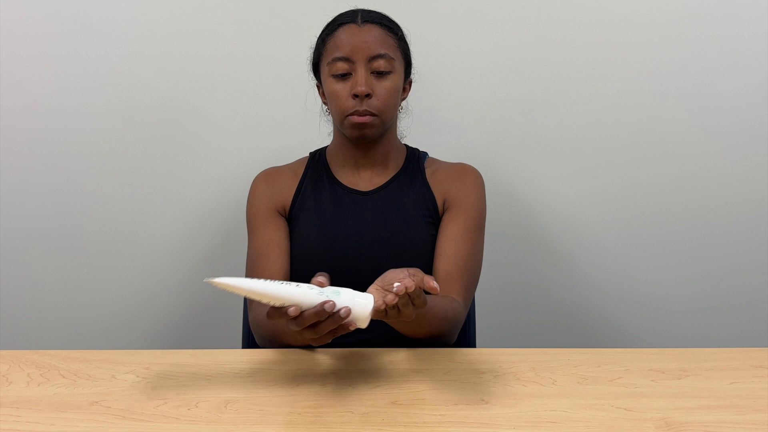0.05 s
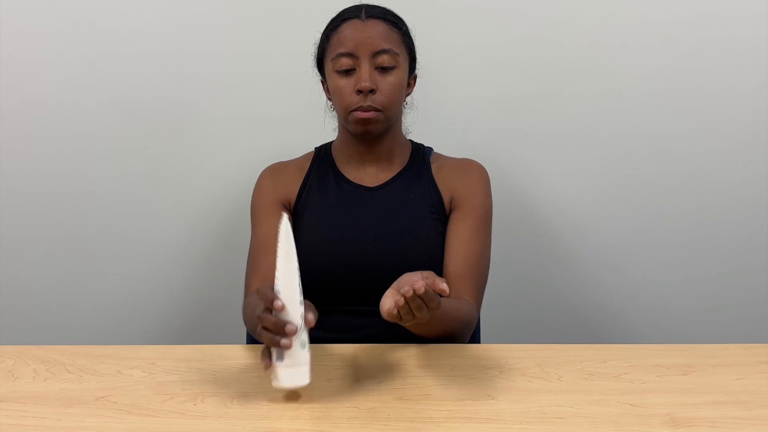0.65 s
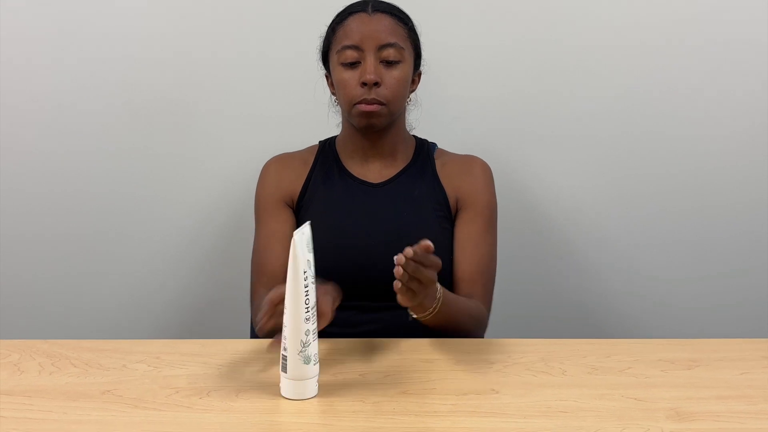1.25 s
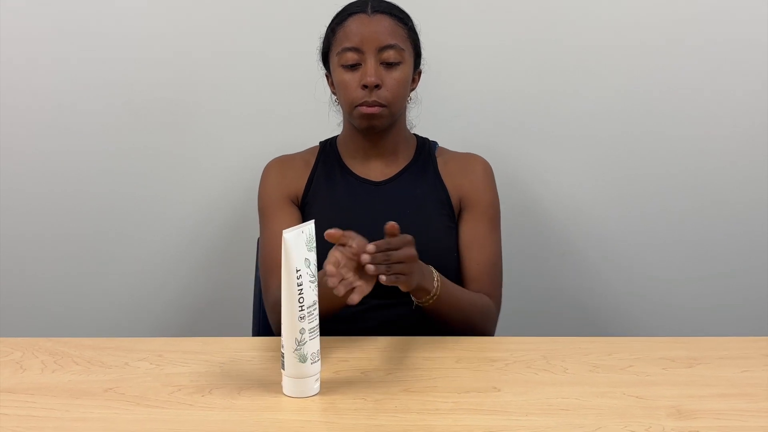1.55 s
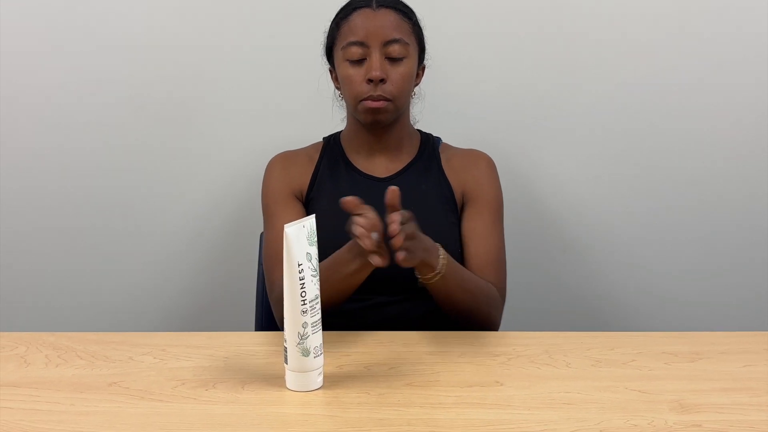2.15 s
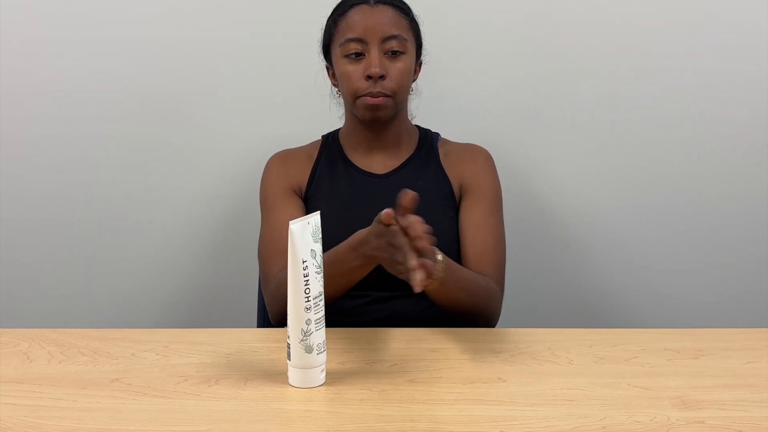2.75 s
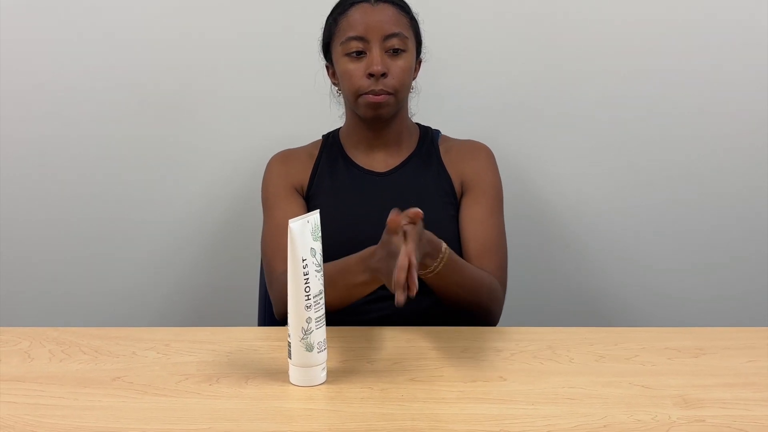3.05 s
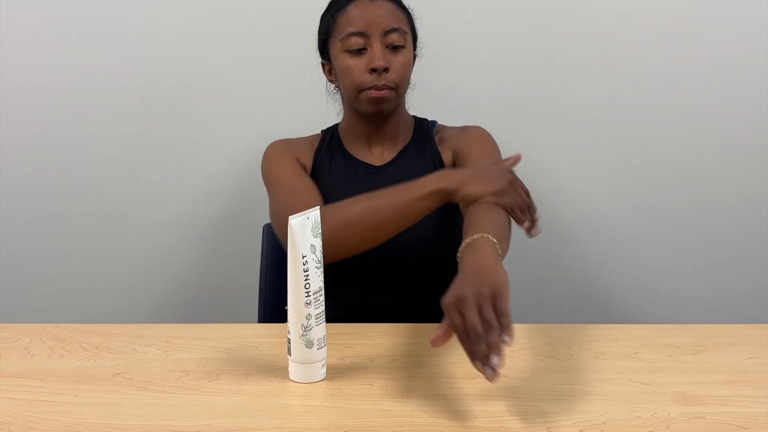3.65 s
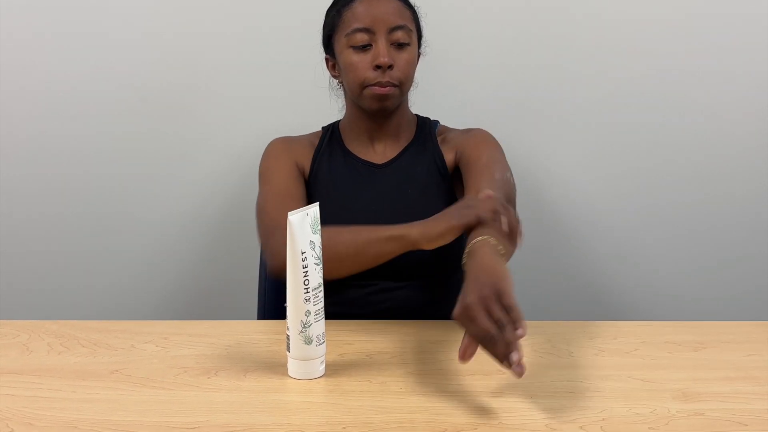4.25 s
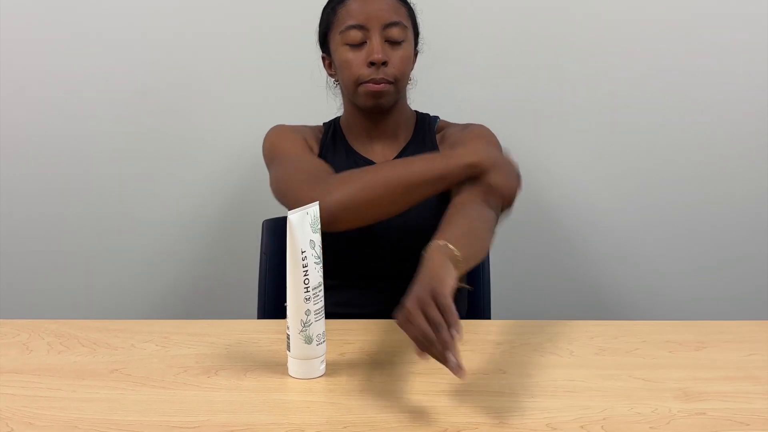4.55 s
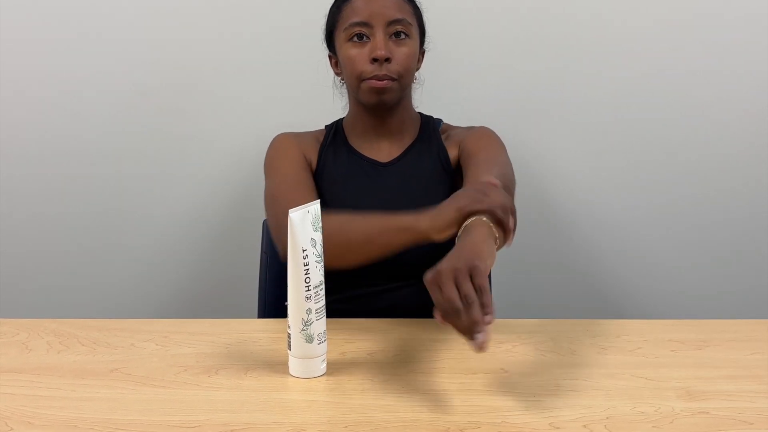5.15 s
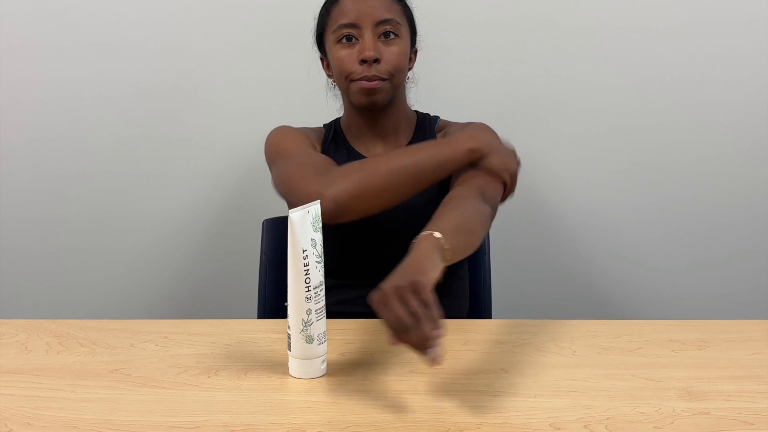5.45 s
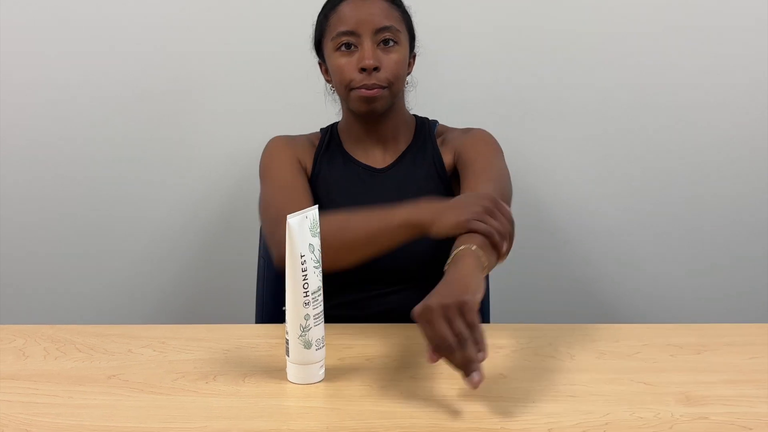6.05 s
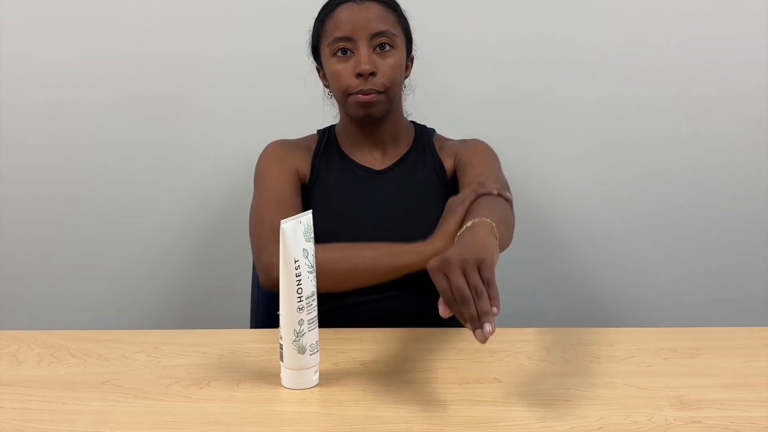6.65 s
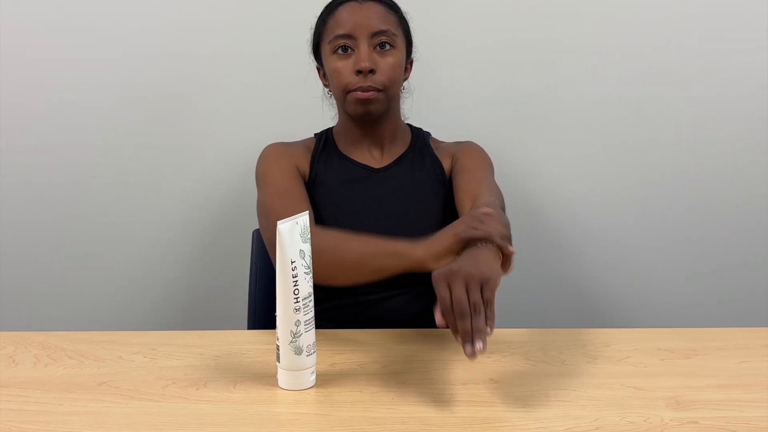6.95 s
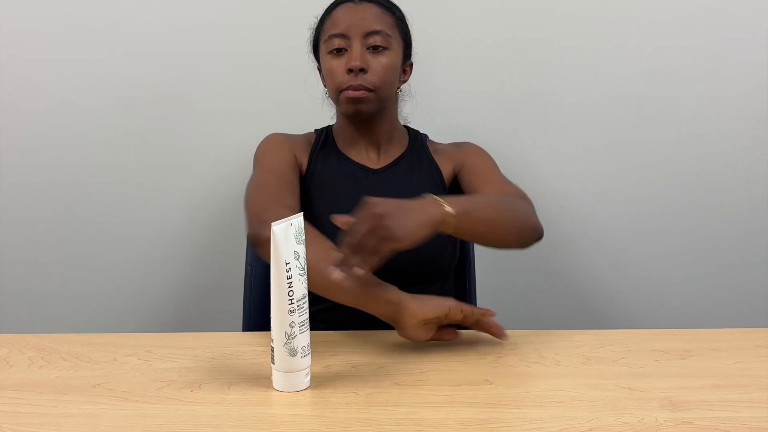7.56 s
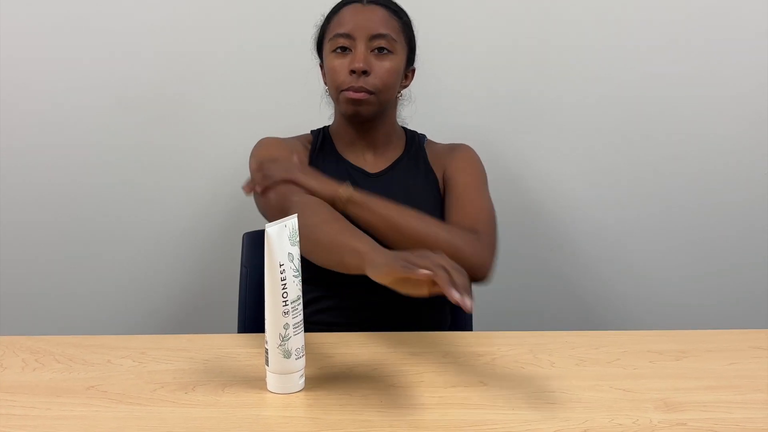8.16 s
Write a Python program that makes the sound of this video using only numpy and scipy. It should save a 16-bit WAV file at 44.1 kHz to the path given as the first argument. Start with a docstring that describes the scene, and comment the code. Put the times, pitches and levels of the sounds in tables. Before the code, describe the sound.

In a small bare room with ventilation rumbling low, nearby stereo microphones catch the sharp click of a lotion cap, slightly left. The tube knocks down on a wooden table and settles with lighter taps. Quiet swishes of palm against palm follow, giving way to longer strokes along an arm, with a few tiny smacks of lotion. Near the end an elbow thumps dully on the table before two more strokes.

```python
"""A small bare room, a stereo microphone pair near a wooden table. A plastic lotion tube snaps shut,
is stood on the table, which rings under it, and rocks to rest. From 2.1 s palms rub together; from
3.6 s a hand strokes up and down an arm. Slipping skin hisses, the hollow under the hand resonates,
lotion smacks. At 7.5 s an elbow bumps the table as the arms change over, and the stroking goes on.
Ventilation rumbles underneath throughout."""
import sys
import numpy as np
from scipy import signal
from scipy.fft import rfft, irfft, next_fast_len
from scipy.io import wavfile

SR = 44100
rng = np.random.default_rng(int(sys.argv[2]) if len(sys.argv) > 2 else 0)


def wrap_up_sound(samples):
    """Save the sound to the file named by the first command line argument, as 16-bit audio."""
    columns = np.atleast_2d(samples).T
    # keep every value between -1 and 1, then stretch to whole-number steps
    tamed = np.clip(columns, -1, 1)
    steps = np.round(tamed * 32767).astype(np.int16)
    wavfile.write(sys.argv[1], SR, steps)


N = 365588
T = np.arange(N) / SR
FFT_SIZE = next_fast_len(N, real=True)

# Palm over palm, then hand along arm; event levels in all tables are relative:
# start t/s, speeding up t/s, slowing down t/s, hiss level/dB, contact/dB, sheen/dB, midway sag/dB
PALM_STROKES = [(2.16, 0.18, 0.04, -66.5, -4.5, -2.5, 5), (2.44, 0.09, 0.092, -63, -2.5, -3.5, -1),
                (2.65, 0.096, 0.13, -62.5, -1, -6, 0.5), (2.86, .1, .11, -60.5, -1.5, -6.5, 3),
                (3.08, 0.11, 0.11, -60.5, -1, -7, 3)]
ARM_STROKES = [(3.6, 0.22, 0.092, -65.5, -2.5, -7.5, -2.5), (3.94, .15, 0.27, -59, -3.5, -8, -1),
               (4.335, .18, .19, -58, -3.5, -8.5, -0.5), (4.72, 0.24, 0.29, -57.5, -5, -7.5, 2.5),
               (5.2, 0.13, 0.23, -58.5, -1.5, -8, 0), (5.585, 0.19, 0.43, -60.5, -3.5, -7, 1),
               (6.05, 0.15, 0.22, -63, -1, -9.5, 0), (6.47, 0.27, .19, -58, -1.5, -7, 10),
               (6.98, 0.11, 0.15, -62, -2, -9, 1), (7.215, .075, 0.11, -69, -4.5, -5.5, -2),
               (7.72, 0.22, 0.12, -67.5, 0, -6.5, -4.5), (8.095, 0.2, .1, -60, -4.5, -8, -1)]
# Hiss of rubbing skin, with the band near 10.5 kHz left out: f/Hz, level/dB
NOTCHED_HISS_COLOUR = [(150, -14), (400, 0), (750, -3.5), (1050, -8), (1400, 1), (2500, -10.5), (4300, 7),
                       (5400, 7), (7200, 9), (8500, 0.5), (10500, -90), (14000, -11)]
# Flat palm on arm, two palms enclosing more air, fine sheen, fingertips: f/Hz, level/dB
FLAT_PALM_COLOUR = [(600, -24), (1300, -9.5), (2100, 0), (3000, -1), (4000, -2.5), (7000, -27)]
CUPPED_COLOUR = [(150, -10), (320, 7), (500, -5), (750, -3), (1100, -4), (2100, 1), (3000, 2), (4000, -3.5),
                 (7000, -29)]
SHEEN_COLOUR = [(6000, -6), (9300, -4.5), (10200, 9), (12000, 9.5), (14000, -13)]
BRUSH_COLOUR = [(1000, -21), (4300, -11), (5500, -2), (6200, -4), (7400, 0.5), (9000, -19), (10600, -1.5),
                (12200, -10), (13500, -30)]
# Room tail of the hiss, a row each for skin, palm contact and sheen: share of energy, t60/s
HISS_TAILS = [(0.2, 0.28), (0.75, 0.28), (.12, 0.26)]
# Air pockets under the hand: middle t/s, length t/s, start f/Hz, end f/Hz, width f/Hz, level/dB
HOLLOWS = [(2.274, 0.078, 1406, 1307, 179, -71), (2.53, 0.12, 1334, 1303, 220, -65.5),
           (2.786, 0.098, 1600, 2190, 450, -65), (2.93, 0.27, 334.8, 310, 161, -64.5),
           (4.454, 0.13, 2032, 2373, 700, -69.5), (4.934, 0.074, 1715, 1400, 600, -68.5),
           (5.115, 0.11, 2734, 3070, 1230, -60.5), (6.252, 0.19, 1455, 1534, 450, -73),
           (6.589, 0.14, 2490, 1255, 505, -66.5), (7.075, 0.26, 2257, 2184, 550, -71.5)]
# Smacks of lotion and skin: t/s, level/dB, centre f/Hz
SMACKS = [(1.579, -78, 6900), (1.862, -82.5, 1210), (4.498, -65, 790), (5.354, -61, 1920),
          (6.264, -66, 4960), (7.498, -60.5, 684)]
# Fingertips on tube and skin: start t/s, speeding up t/s, slowing down t/s, level/dB
BRUSHES = [(.468, 0.0084, 0.021, -80), (.56, 0.057, 0.046, -82.5), (1.0, 0.057, 0.02, -72),
           (1.09, 0.073, 0.11, -73.5), (1.59, 0.073, 0.2, -72.5), (3.32, 0.033, 0.074, -86),
           (7.64, 0.076, 0.069, -75)]

# The cap catching, then shutting: t/s, click level/dB, ring level/dB
CAP_SNAPS = [(0.0333, -61, -64), (0.0498, -42.5, -52.5)]
# Blows on the table by the tube and, last, the elbow:
# t/s, table level/dB, tube level/dB, knock level/dB, contact corner f/Hz, tick level/dB
TABLE_BLOWS = [(0.7742, -30.5, -41, -36.5, 1350, -46.5), (1.0452, -38.5, -42, -44, 1170, -59.5),
               (1.383, -55, -51, -53, 856, -88), (1.415, -74, -64, -70, 905, -89),
               (1.487, -66, -57, -60.5, 610, -99), (1.524, -59, -65.5, -59.5, 646, -99),
               (7.495, -40.5, -64, -53, 229, -71.5)]
# Modes of the lid, the hollow tube and the table top: f/Hz, level/dB, t60/s
CAP_MODES = [(745, -9, 0.045), (905, 15, 0.16), (1055, -12, 0.037), (1666, -26, 0.016), (2090, -22, .015),
             (3300, -12, 0.014), (3390, -15, 0.45), (5760, -20, .01)]
TUBE_MODES = [(537.5, 4.5, 0.084), (676, -3.5, 0.027), (790, -3, 0.09), (892, -2, 0.047),
              (1125, 0.5, 0.032), (1430, -3.5, 0.048), (1670, -17, 0.12), (1890, -26, .08),
              (2430, -22, 0.019)]
TABLE_MODES = [(92.2, -9, 0.33), (149.2, -18, 1), (248.1, -3.5, 0.62), (287.8, -2.5, 0.35),
               (309.7, 2.5, 0.34), (345.5, 0, 0.25), (375, -9.5, 0.21), (393, -18, .3), (531, -5, 0.17)]
# Spectra of the cap's snap and of the knock and tick on wood: f/Hz, level/dB
SNAP_COLOUR = [(30, -29), (150, -2), (300, 1.5), (700, 2), (1050, 3), (1400, -2), (2400, -7.5), (3400, -5),
               (4500, -17), (7000, -8.5), (9000, -20.5), (13000, -17)]
KNOCK_COLOUR = [(30, -34.5), (100, -1.5), (200, -3.5), (290, 3.5), (390, 10), (480, 2), (620, -7.5),
                (900, -18), (1400, -4.5), (1800, -5.5), (2600, -6.5), (8000, -9.5)]
TICK_COLOUR = [(300, -15.5), (1500, -8), (2600, 5), (3400, -4.5), (4200, -8.5), (5800, 1), (8000, -10.5),
               (13000, -11.5)]

# Reverberation of the room: f/Hz, t60/s
ROOM_T60 = [(100, 1), (260, 0.63), (700, 0.45), (1800, 0.4), (3400, 0.41), (6000, 0.26), (12000, 0.17)]
# Ventilation rumble: f/Hz, level/dB
VENT_COLOUR = [(15, -6.5), (30, 1.5), (42, 0.5), (62, 6.5), (85, -2), (120, -5.5), (200, -9), (320, -16.5),
               (500, -27), (800, -33), (1500, -44), (3000, -45), (6000, -49.5), (13000, -64)]
# Width of diffuse sound at the pair: f/Hz, side minus mid level/dB
MIC_WIDTH = [(40, -18), (130, -13), (300, -7), (600, -3), (1200, 0), (2600, -4), (4000, -3), (5200, -1),
             (7200, -4), (9200, 5), (10500, -3), (13000, -2)]
# Lead of the left microphone: f/Hz, phase/rad
MIC_LEAD = [(700, 0), (2100, .7), (3200, .5), (5000, 0), (7000, -.2), (9000, 0)]
# Balance of the pair: f/Hz, left minus right level/dB
MIC_BALANCE = [(80, 0.42), (400, 1), (2500, 0.68), (4800, -1.4), (8000, 0)]


def rubbing(strokes, textures, speed_power, skin_db, contact_db, sheen_db, grip_db, sag_width=.2):
    """Countless tiny slips of skin hiss, louder with speed; the palm adds body and the grip wavers."""
    energies = np.zeros((3, N))
    for start, rise_s, fall_s, db, contact, sheen, sag_db in strokes:
        progress = (T - start) / (rise_s + fall_s)
        midway = np.exp(-((progress - .5) / sag_width) ** 2)  # where the hand eases off or bears down
        friction = hand_speed(start, rise_s, fall_s) ** speed_power * undb(db - sag_db * midway)
        gains = undb([skin_db, contact + contact_db, sheen + sheen_db])
        energies += np.outer(gains, friction) ** 2
    hiss = sum(texture * np.sqrt(linger(energy, *tail))
               for texture, energy, tail in zip(textures, energies, HISS_TAILS))
    return hiss * undb(grip_db * wander(70))


def hand_speed(start, rise_s, fall_s, turn_s=0.035):
    """Speed of one stroke, 0-1; the skin still slips for turn_s beyond either end."""
    times = [start - turn_s, start + rise_s, start + rise_s + fall_s + turn_s]
    return np.sin(np.interp(T, times, [0, np.pi / 2, np.pi]))


def skin_patches(hiss, flicker_db=2.0, flicker_hz=24, swell_db=1.0, swell_hz=7):
    """Each patch of skin grips and lets go by itself, so bands flicker and swell separately."""
    change = 0
    for hz in np.geomspace(1300, 7000, 7):
        band = signal.lfilter(*signal.iirpeak(hz, Q=5, fs=SR), hiss)
        gain = undb(flicker_db * wander(flicker_hz) + swell_db * wander(swell_hz))
        change += band * (gain - 1)
    return hiss + change


def hollows(walls, trim_db=-1):
    """Friction excites the air pocket under the hand, whose pitch slides as it changes size."""
    out = np.zeros(N)
    for s, length, start_hz, end_hz, width_hz, db in HOLLOWS:
        n = int(length * SR)
        narrow = signal.butter(2, width_hz / 2, fs=SR, output="sos")
        re, im = signal.sosfilt(narrow, rng.standard_normal((2, SR)))[:, -n:]
        phase = 2 * np.pi * np.cumsum(np.linspace(start_hz, end_hz, n)) / SR
        resonance = unit(re * np.cos(phase) + im * np.sin(phase))
        add(out, s - length / 2, undb(db + trim_db) * np.hanning(n) * resonance)
    return room(out, walls, wet_db=-1, left_db=7)


def smacks(walls, skirt_db=-19, span=4):
    """Tacky skin meets or parts with a short damped pop, coloured by the air it traps."""
    out = np.zeros(N)
    for s, db, hz in SMACKS:
        colour = [(hz / span, skirt_db), (hz, 0), (hz * span, skirt_db), (hz * span ** 2, 2 * skirt_db)]
        add(out, s, undb(db) * click(colour, lag_s=0.00152))
    return room(out, walls, wet_db=0, left_db=2)


def brushing(trim_db=-1, speed_power=1.94):
    """Fingertips barely touch, so only a thin high whisper reaches the microphones."""
    touch = sum(undb(db + trim_db) * hand_speed(start, rise_s, fall_s) ** speed_power
                for start, rise_s, fall_s, db in BRUSHES)
    return diffuse_noise(BRUSH_COLOUR) * touch


def cap(walls):
    """Left of the pair, the plastic lid catches on its rim, snaps home and rings."""
    out = np.zeros((2, N))
    crack = room(click(SNAP_COLOUR, lag_s=0.00113), walls, wet_db=-2.5, left_db=6)
    lid = room(ring(CAP_MODES, rise_s=.0005), walls, wet_db=-5, left_db=12)
    for s, click_db, ring_db in CAP_SNAPS:
        add(out, s, undb(click_db) * crack)
        add(out, s, undb(ring_db) * lid)
    return out


def table(walls):
    """Each blow is a hard tick and a dull knock, and sets the table top and the tube on it ringing."""
    out = np.zeros((2, N))
    tick = room(click(TICK_COLOUR, lag_s=0.000945), walls, wet_db=-12, left_db=3.5)
    for s, top_db, tube_db, knock_db, corner_hz, tick_db in TABLE_BLOWS:
        top = room(ring(TABLE_MODES, 0.013, corner_hz), walls, wet_db=-13.5, left_db=0)
        knock = room(click(KNOCK_COLOUR, corner_hz), walls, wet_db=1, left_db=2)
        tube = room(ring(TUBE_MODES, 0.0016, 2 * corner_hz), walls, wet_db=-3.5, left_db=9)
        for db, part in (top_db, top), (knock_db, knock), (tube_db, tube), (tick_db, tick):
            add(out, s, undb(db) * part)
    return out


def ring(modes, rise_s, corner_hz=SR):
    """Modes of a struck body build up, then fade; soft contact spares the high ones."""
    t = T[:SR]
    tones = 0
    for k, (hz, db, t60) in enumerate(modes):
        gain = (-1) ** k * undb(db) / np.hypot(1, (hz / corner_hz) ** 2)
        tones += gain * np.sin(2 * np.pi * hz * t) * undb(-60 * t / t60)
    return burst(tones * (1 - np.exp(-t / rise_s)))


def click(colour, corner_hz=SR, lag_s=0.000907, size=2048):
    """An impact, duller above corner_hz when contact is soft; lag_s is the added delay at 1 kHz."""
    hz = np.arange(size // 2 + 1) * SR / size
    gain = undb(along(colour, hz)) / np.hypot(1, (hz / corner_hz) ** 2)
    cepstrum = irfft(np.log(gain))
    cepstrum[1:size // 2] *= 2  # folded to minimum phase for a sharp attack
    cepstrum[size // 2 + 1:] = 0
    bending = 4 * np.pi * lag_s * np.sqrt(1000 * hz)  # bending waves carry treble ahead of bass
    return burst(irfft(np.exp(rfft(cepstrum) - 1j * bending)))


def room(x, walls, wet_db, left_db):
    """Direct sound, reaching the right microphone two samples later, plus the wall echoes."""
    response = undb(wet_db) * walls
    response[0, 0] += undb(left_db / 2)
    response[1, 2] += undb(-left_db / 2)
    return signal.fftconvolve(x[None], response, axes=1)[:, :N]


def reflections(build_s=0.0003, size=32768):
    """Dense echoes from the bare walls, whose treble dies first."""
    t, hz = T[:size], np.arange(size // 2 + 1) * SR / size
    white = rfft(diffuse_noise([(1, 0), (SR, 0)], size))
    tail = 0
    for band_hz, t60 in ROOM_T60:
        share = along([(f, float(f == band_hz)) for f, _ in ROOM_T60], hz)
        tail += irfft(white * share) * undb(-60 * t / t60)
    tail *= 1 - np.exp(-t / build_s)
    return tail / np.sqrt(np.sum(tail.mean(axis=0) ** 2))


def linger(energy, share, t60):
    """A share of the sound energy comes back from the walls and fades."""
    keep = 1e-6 ** (1 / (t60 * SR))
    return (1 - share) * energy + share * signal.lfilter([1 - keep], [1, -keep], energy)


def ventilation(level_db=-55.5):
    """Room tone: a low steady rumble of air."""
    return diffuse_noise(VENT_COLOUR) * undb(level_db)


def diffuse_noise(colour, size=FFT_SIZE):
    """Coloured noise at the pair, with a mid of rms 1; the bass is alike in both microphones."""
    hz = np.arange(size // 2 + 1) * SR / size
    mid, side = rfft(rng.standard_normal((2, size))) * undb(along(colour, hz))
    width = undb(along(MIC_WIDTH, hz))
    mid, side = np.array([mid, side * width]) / np.hypot(1, width)
    lean = undb(along(MIC_BALANCE, hz) / 2) * np.exp(.5j * along(MIC_LEAD, hz))
    pair = irfft(np.array([(mid + side) * lean, (mid - side) / lean]), size)[:, :N]
    return pair / np.std(pair.mean(axis=0))


def wander(rate_hz):
    """Random drift with a spread near 1."""
    return np.interp(T * rate_hz, np.arange(4096), rng.standard_normal(4096))


def undb(db):
    """Decibels to gain."""
    return 10 ** (np.asarray(db) / 20)


def along(points, hz):
    """Read (f/Hz, value) points on a log-frequency axis."""
    f, value = np.transpose(points)
    return np.interp(np.log(hz + 1e-6), np.log(f), value)


def unit(x):
    """Scale to rms 1."""
    return x / np.sqrt(np.mean(x ** 2))


def burst(x):
    """Scale a transient to the energy of 30 ms at rms 1."""
    return x / np.sqrt(np.sum(x ** 2) / (.03 * SR))


def add(out, s, x):
    """Mix x into out from time s on."""
    start = max(int(s * SR), 0)
    part = x[..., :max(N - start, 0)]
    out[..., start:start + part.shape[-1]] += part


def scene():
    """Hands, tube, table and room tone as they reach the pair."""
    walls = reflections()
    colours = NOTCHED_HISS_COLOUR, FLAT_PALM_COLOUR, CUPPED_COLOUR, SHEEN_COLOUR
    hiss, flat, cupped, sheen = map(diffuse_noise, colours)
    palms = rubbing(PALM_STROKES, (hiss, cupped, sheen), speed_power=2.07,
                    skin_db=0, contact_db=-0.5, sheen_db=2, grip_db=1.2)
    arms = rubbing(ARM_STROKES, (hiss, flat, sheen), speed_power=1.37,
                   skin_db=-2, contact_db=-1, sheen_db=0.5, grip_db=0.71)
    hands = skin_patches(palms + arms) + hollows(walls) + smacks(walls) + brushing()
    return hands + cap(walls) + table(walls) + ventilation()


def record(dry):
    """The recorder cuts steeply above 13.2 kHz."""
    return signal.sosfilt(signal.ellip(8, .2, 70, 13200, fs=SR, output="sos"), dry)


dry = scene()
out = record(dry)
wrap_up_sound(out)
```